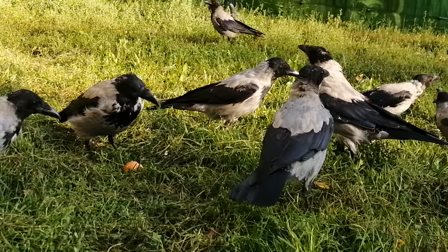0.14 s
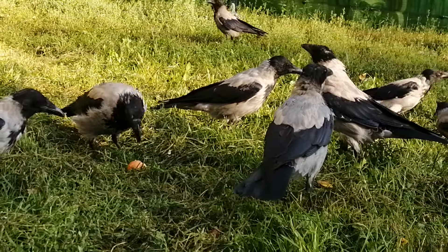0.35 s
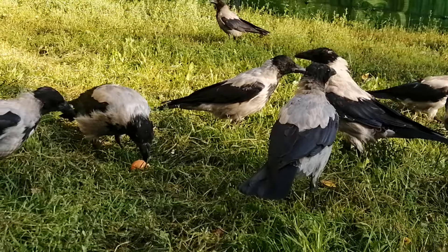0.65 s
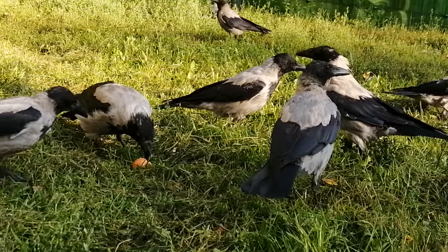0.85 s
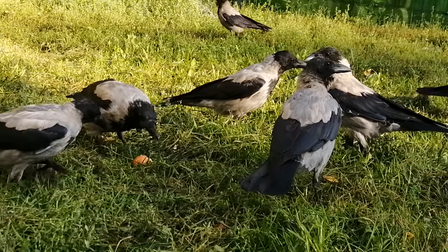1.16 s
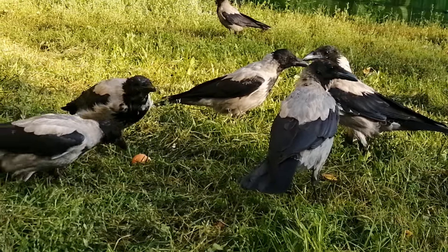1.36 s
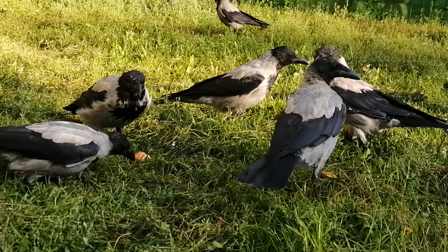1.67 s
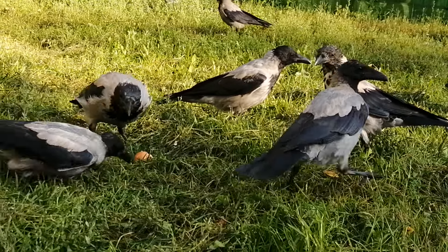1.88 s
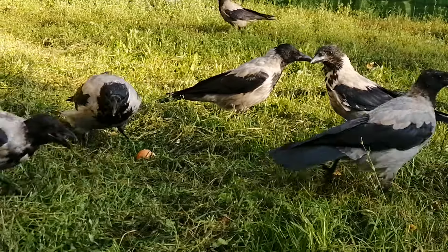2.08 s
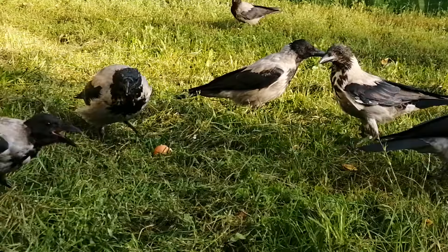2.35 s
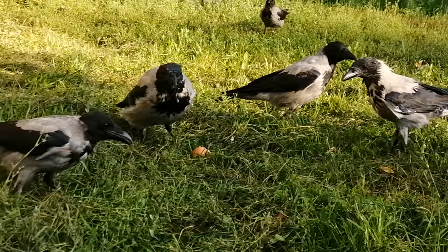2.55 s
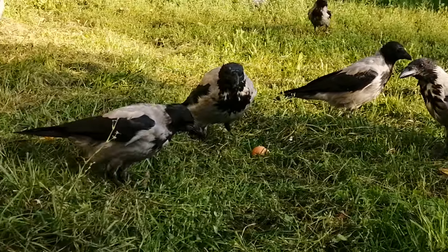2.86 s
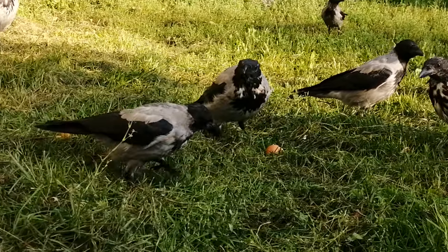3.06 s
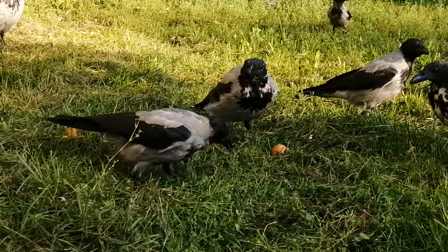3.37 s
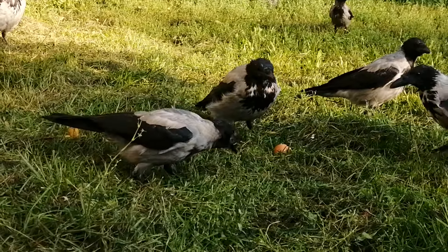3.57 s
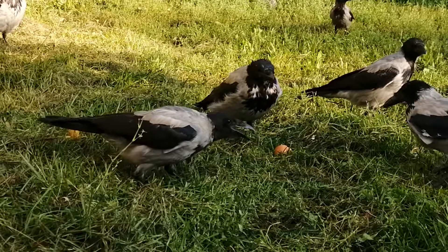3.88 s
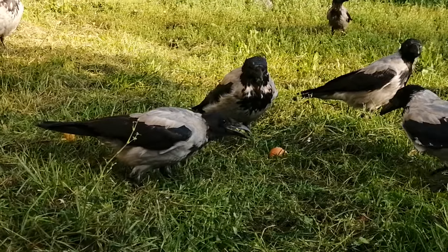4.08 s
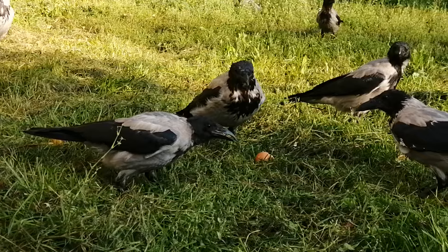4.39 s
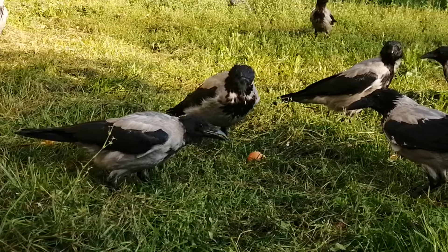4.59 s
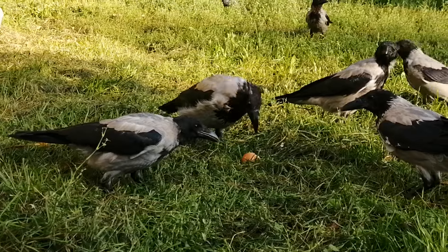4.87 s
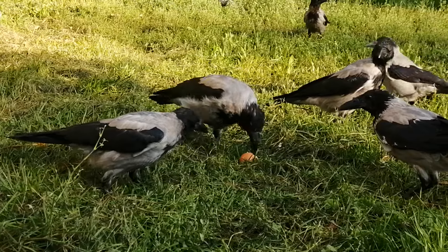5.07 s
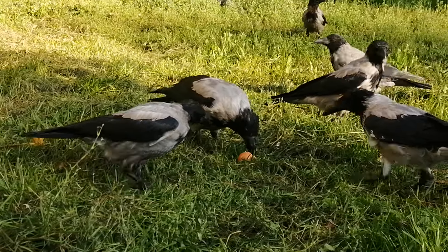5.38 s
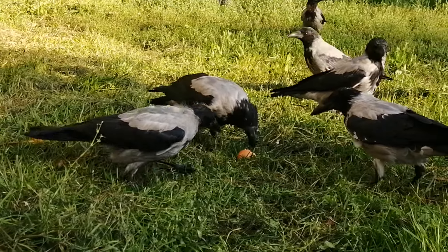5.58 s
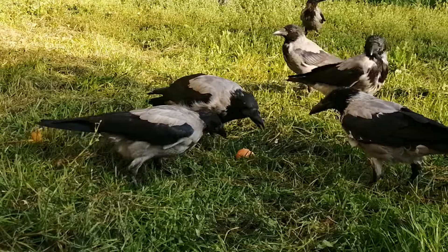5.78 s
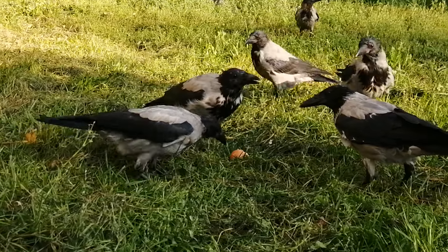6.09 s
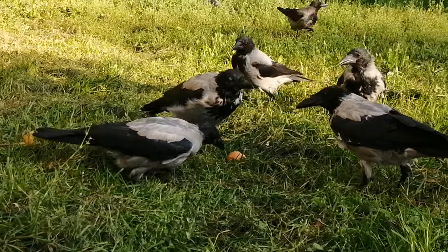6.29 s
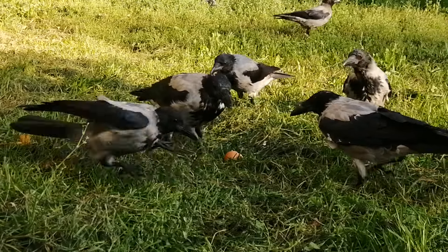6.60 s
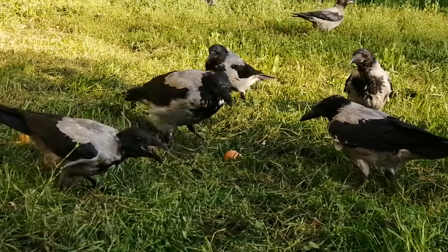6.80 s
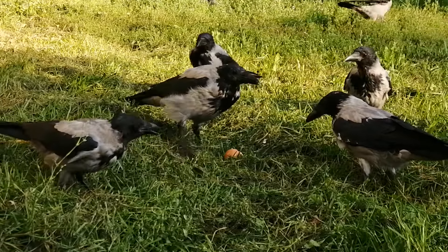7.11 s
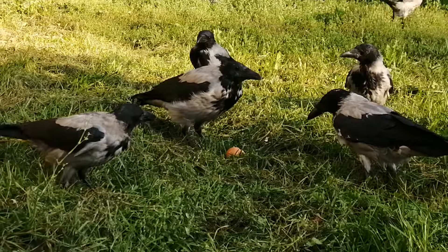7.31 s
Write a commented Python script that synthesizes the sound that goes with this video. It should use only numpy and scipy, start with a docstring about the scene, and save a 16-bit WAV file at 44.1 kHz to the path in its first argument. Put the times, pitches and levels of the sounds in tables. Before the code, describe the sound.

Crows forage near the microphone on an open lawn, over a soft, steady rumble of distant town traffic. A low, rough grunt opens the scene and fades within half a second. Light, dry ticks of beaks and claws follow, the sharpest near 1 second, with very faint crackling of grass underfoot. At 2 seconds a crow gives one harsh, rattling caw, under half a second long, dropping in pitch at its end. A peck lands at 3 seconds, and a second caw follows at 3.5. Then comes a lull with only a few small ticks, around 4.2, 5.1 and 6 seconds. A quiet growl begins at 6.4 seconds and runs into the third caw at 6.7. Several short, low, throaty growls answer from about 7.1 to 7.5 seconds. The caws are the loudest sounds, each leaving a faint, brief echo from the trees.

```python
"""Hooded crows squabbling on a lawn

Nearby crows give three harsh caws and a few low growls over a scrap. Both sides of the syrinx vibrate
at once, as coupled oscillators whose beat makes the rattle; windpipe, throat and beak filter the pulses.
Beaks and feet tick and crackle in the grass. A far fence and trees reflect a faint echo of the calls
and ticks, over the rumble of a town."""
import sys
import numpy as np
from scipy import signal
from scipy.fft import rfft, irfft
from scipy.io import wavfile
from scipy.ndimage import uniform_filter1d

SR = 44100
rng = np.random.default_rng(int(sys.argv[2]) if len(sys.argv) > 2 else 0)


def pcm_store(signal):
    """Save signal as 16-bit PCM."""
    levels = np.round(np.clip(np.atleast_2d(signal), -1, 1) * 32767)
    wavfile.write(sys.argv[1], SR, levels.astype(np.int16).T)


N = 328479

# Response of throat and beak as each bird faces the listener, one table for each kind of call:
# frequency_hz, gain_db, left_minus_right_db, left_lead_rad
FIRST_CAW_THROAT = [(183, -16.5, 4, 0.7), (327, -10, 4, 0.14), (875, -16.5, 4.5, 0.67),
                    (1056, -24.5, -8, 1.65), (1562, 6.5, -5, 2.29), (1933, 5.5, -1, 3.65),
                    (2400, -5, 3, 5.63), (2990, -12.5, -1.5, 5.1), (3540, -19, -10.5, 3.5),
                    (3890, -10, -9, 8), (4960, -9.5, 6.5, 8), (5920, -17, -9, 8.5),
                    (6650, -11.5, -3.5, 10.6), (8070, -24, -24, 10.3), (11000, -42.5, -8, 18.3),
                    (14500, -53.5, -20, 5)]
SECOND_CAW_THROAT = [(173, 0.5, 13, 0.5), (340, 8.5, 0.5, 0.14), (660, 6.5, 2.5, 0.23), (1250, 0, -0.5, 1),
                     (1394, -10.5, -9, -2.5), (1820, 1, 2, 4), (2450, -9, 1.5, 4.5), (2930, -8, 2.5, 4),
                     (3720, -6, -15, 7), (3700, 1, -0.5, 9), (4550, -3.5, -10.5, 4), (6240, -6.5, 1.5, 7.5),
                     (6930, -18.5, -5, 8), (8540, -29.5, -13, 3.5), (11000, -40.5, -11, 5),
                     (14500, -49, -24, -6)]
THIRD_CAW_THROAT = [(179, -18, 4, 1), (342, -13, 3.5, 0.16), (800, -18.5, 3.5, 0.44), (1194, -21.5, -5, 2),
                    (1520, 8.5, -8.5, 1.5), (2080, 9, 2.5, 4), (2290, 2, 1, 5), (2870, -6.5, 7, 8.5),
                    (3420, -13.5, -24, 6), (4250, -8.5, -2, 14.5), (5530, -10, 1, 12.5),
                    (6340, -17, -22, 18.5), (7150, -17, 0.5, 16.5), (8180, -27.5, -10, 13),
                    (10700, -45, -17, -8), (14500, -58, -18, 21)]
GRUNT_THROAT = [(200, -18, -9, 1), (390, 8, -4, -0.1), (845, -8, 5, 1.5), (1200, -10, -1, 0.4),
                (2040, -14.5, 25, -0.5), (2310, -5, 2, 5), (2950, -11.5, -5, 3.5), (3810, -2, -2, 4.6),
                (4200, -20, 6, 8), (5730, -9.5, -2, 7.5), (7650, -18, -10, 11.5), (8550, -45, -8, 6),
                (14000, -47, -2, 9)]
GROWL_THROAT = [(199, -16, -2, 1), (397, 7, 1, 0.27), (900, -2.5, 3.5, 0.61), (1530, -30, 3, 2.0),
                (2430, -18, 10, 6.1), (2920, -20, 2, 1.1), (3720, -8.5, -0.5, 7.4), (4670, -19, -11, 20),
                (5100, -16, 1, 6.9), (7600, -23, -16, 7.6), (8900, -33, -14.5, 15), (14100, -49, 4, 6)]
REPLY_THROAT = [(201, -3.5, -21, 0.5), (450, 18, -9, -1), (1150, -2.5, -6, -1.5), (1410, 9.5, 0, -2.5),
                (1970, -3, 10, -2), (2210, 8, 4, 1.4), (3350, -26, -4, 1), (4350, -13, 5, 4.5),
                (5100, -23, -6, -3.5), (5860, -21, -1, -1), (7600, -33, -17, -6), (9000, -56, -6, -3),
                (14000, -70, -6, -11)]
# Caws: start_s, length_s, attack_s, crest_s, top_pitch_hz, flat_start_share, second_pitch_ratio,
# second_join_s, second_gain, crest_roughness, low_db, throat_db, edge_db, fade_db_per_s, echo_send_db
CAW_CALLS = [(2.011, 0.377, 0.024, 0.25, 348.5, 0.325, 1.26, 0.115, 0.69, 0.25, -39.5, -26.5, -31.5, -18, -2),
             (3.49, 0.417, 0.048, 0.205, 328.2, 0.085, 1.32, -0.034, 0.41, 0.37, -40, -36.5, -37, -14.5, 2.5),
             (6.679, 0.354, 0.011, 0.19, 334.3, 0.22, 1.26, -0.01, 0.4, 0.33, -39, -29, -33, -14.5, -2)]
# Two windpipe resonances for each caw:
# slide_at_s, lower_from_hz, lower_to_hz, upper_from_hz, upper_to_hz, gain_before, gain_after, flare_db
WINDPIPE_RESONANCES = [(0.106, 2330, 2290, 5900, 4120, 1.0, 0.77, 3.5),
                       (0.092, 2500, 2310, 4760, 4040, 1, 1.05, 0.5),
                       (0.262, 2320, 2320, 5630, 4200, 1, 1.5, -0.3)]
# Growls, the last row being the onset of a further call just as the sound ends: start_s, length_s, pitch_hz,
# attack_s, low_db, throat_db, edge_db, fade_db_per_s, throat_name
GROWL_CALLS = [(0.016, 0.29, 196.7, 0.022, -47, -44.5, -50.5, -125, "grunt"),
               (0.322, 0.074, 186, 0.01, -61.5, -65.5, -89, -15, "grunt"),
               (6.421, 0.28, 212.7, 0.03, -53.5, -66, -66.5, 16, "growl"),
               (6.662, 0.05, 224.5, 0.0049, -46.5, -45.5, -47.5, -28, "reply"),
               (7.083, 0.19, 191, 0.017, -58.5, -67.5, -82, 41, "reply"),
               (7.193, 0.128, 201.6, 0.038, -44.5, -41.5, -50.5, -83, "reply"),
               (7.301, 0.15, 192.6, 0.015, -55.5, -52.5, -65, 18, "reply"),
               (7.434, 0.065, 185, 0.012, -69, -43.5, -42.5, -23, "reply")]
# Pecks and steps: start_s, level_db, t60_s, left_minus_right_db, tilt_db_per_octave
IMPACTS = [(0.3616, -62, 0.06, 2.5, 2), (0.8516, -52.5, 0.078, 10, -0.5), (0.9589, -42.5, 0.007, -11, 8),
           (1.3478, -60.5, 0.02, -3, 12), (1.5594, -62, 0.025, -8, 2), (2.4384, -61, 0.032, -16, 16),
           (2.5643, -55, 0.053, -6, 3), (3.0131, -45.5, 0.079, -3, -1.5), (4.2137, -51, 0.016, -8, 3),
           (5.0903, -52.5, 0.033, -4, 2.5), (5.9728, -55.5, 0.012, -4, 20.5), (6.382, -65, 0.012, -4, 19)]
# Spectrum of a beak or claw impact: frequency_hz, gain_db
IMPACT_SPECTRUM = [(530, 13), (900, -2), (1620, -19), (2010, 9.5), (2810, -12.5), (4050, -2), (5280, -9),
                   (5990, -14), (8350, -34.5), (9810, -52), (14000, -50)]
# Bouts of walking: middle_s, half_length_s, level_db
WALKING_BOUTS = [(1.35, 0.94, -81), (2.965, 0.26, -72), (5.15, 0.2, -78.5), (7.4, 0.85, -75)]
# Spectrum of crackling blades: frequency_hz, gain_db
GRASS_SPECTRUM = [(1500, -4), (3000, 0), (5500, 0.5), (7600, -1.5), (8800, -15.5), (14500, -20)]
# Spectrum returned by the trees: frequency_hz, gain_db
ECHO_SPECTRUM = [(200, 7), (600, 5.5), (1200, -2), (2000, 11), (2900, 1.5), (5000, 3), (12000, 10)]
# Spectrum of the town and the air: frequency_hz, relative_density_db
TOWN_SPECTRUM = [(12, -39), (20, -21.5), (59, -3), (76, -2.5), (189, -14.5), (211, -11), (270, -20),
                 (302, -18), (328, -20.5), (484, -27.5), (940, -29), (2220, -42), (5690, -52), (9630, -66),
                 (15000, -70)]
# Likeness of the town's sound at left and right: frequency_hz, correlation
TOWN_CORRELATION = [(60, 0.97), (130, 0.87), (290, 0.89), (640, 0.39), (1400, -0.4), (3090, 0.0039),
                    (6790, -0.089), (14900, -0.022)]
# Balance of the town's sound: frequency_hz, left_minus_right_db
TOWN_BALANCE = [(60, -1.0), (180, -1.5), (550, 0), (1640, -5.5), (4960, 0.5), (14900, -4)]

# The voice has three bands: low tones, throat, treble edge.
BAND_DB_PER_SAG = (-15, -28, -26.5)  # each weakens as the pitch sags below its crest
BAND_ATTACK_RATIOS = (0.57, 1.32, 1)  # the low tones speak first


def crows():
    """Direct and reflected paths: returns the calls heard nearby and those that carry to the trees."""
    near, far = np.zeros((2, 2, N))
    throats = (FIRST_CAW_THROAT, SECOND_CAW_THROAT, THIRD_CAW_THROAT)
    for (start_s, *call, echo_send_db), pipe, throat in zip(CAW_CALLS, WINDPIPE_RESONANCES, throats):
        sound = caw(call, pipe, throat)
        add(near, start_s, sound)
        add(far, start_s, sound * amp(echo_send_db))
    for start_s, *call in GROWL_CALLS:
        sound = growl(*call)
        add(near, start_s, sound)
        add(far, start_s, sound)
    return near, far


def caw(call, pipe, throat, fall_share=0.26, yelp_s=0.0282, yelp_hz=15.75, solo_grip=0.29):
    """Source and filter: one arch of effort sets the pitch, loudness and roughness of the syrinx."""
    (length_s, attack_s, crest_s, top_hz, flat_share, second_ratio, join_s, second_gain,
     crest_roughness, *bands_db, fade_db_per_s) = call
    t = np.arange(SR // 2) / SR
    # the pitch overshoots in a yelp, climbs to its crest, then drops ever faster
    yelp = 0.313 * np.exp(-t / yelp_s) * np.cos(2 * np.pi * yelp_hz * t)
    sag = flat_share * (np.clip(1 - t / crest_s, 0, 1) ** 1.35 + yelp)
    sag += fall_share * np.clip((t - crest_s) / (length_s - crest_s), 0, 1) ** 2.3
    pitch_hz = top_hz * (1 - sag)
    # the coupling tightens as the second side joins and pulls away to its own pitch
    grip = solo_grip + (1 - solo_grip) * step(t, join_s, width_s=0.0058)
    detuning = (second_ratio - 1) * (1 + step(t, join_s, width_s=0.0194)) / 2
    wander = np.exp(0.312 * drift(len(t), 17.8))
    roughness = np.minimum(grip * (crest_roughness + 1.46 * sag) * wander, 1)
    voice = syrinx(pitch_hz, pitch_hz * (1 + detuning), 0.61 * grip, roughness, second_gain,
                   jitter_s=0.0001, hiss=0.78)
    voice, flare_db = windpipe(voice, t, pipe)
    low_db, throat_db, edge_db = (
        db + db_per_sag * sag + fade_db_per_s * (t - crest_s) + envelope_db(t, ratio * attack_s, length_s)
        for db, db_per_sag, ratio in zip(bands_db, BAND_DB_PER_SAG, BAND_ATTACK_RATIOS))
    return radiate(voice, throat, (low_db, throat_db + flare_db, edge_db), smear_ms=1.137)


def growl(length_s, pitch_hz, attack_s, low_db, throat_db, edge_db, fade_db_per_s, throat_name,
          beat_hz=80.8, sink_hz_per_s=95):
    """Low tension: the slack membranes of the syrinx vibrate slowly and unevenly, sinking in pitch."""
    t = np.arange(SR // 2) / SR
    main_hz = pitch_hz - sink_hz_per_s * t
    voice = syrinx(main_hz, main_hz + beat_hz, coupling=0.34, roughness=np.full(len(t), 0.88),
                   second_gain=0.9, jitter_s=0.000477, hiss=0.75)
    throat = {"grunt": GRUNT_THROAT, "growl": GROWL_THROAT, "reply": REPLY_THROAT}[throat_name]
    contour_db = fade_db_per_s * t + envelope_db(t, attack_s, length_s)
    return radiate(voice, throat, [db + contour_db for db in (low_db, throat_db, edge_db)], smear_ms=0.836)


def syrinx(main_hz, second_hz, coupling, roughness, second_gain, jitter_s, hiss, rattle_depth=0.5):
    """Coupled oscillators: two membranes squeeze each other and rattle at their difference frequency."""
    n = len(main_hz)
    main_cycles, second_cycles = (np.cumsum(hz * (1 + 0.02397 * roughness * drift(n, 71.8))) / SR
                                  for hz in (main_hz, second_hz))
    rattle = np.exp(rattle_depth * coupling * np.cos(2 * np.pi * (second_cycles - main_cycles)))
    pull_cycles = 0.12 * second_gain * coupling * np.sin(2 * np.pi * second_cycles)
    main = claps(main_cycles + pull_cycles, rattle, jitter_s * roughness, 0.26 * roughness)
    second = claps(second_cycles, second_gain * coupling * rattle, jitter_s * roughness, 0.67 * roughness)
    # air escapes in a puff after each clap
    puffs = np.exp(-(main_cycles % 1) / 0.33) * rattle * rng.standard_normal(n)
    # the second membrane also swings smoothly, which gives a clean low tone
    low_tone = 0.077 * coupling * np.cos(2 * np.pi * second_cycles)
    voice = unit(main + second) + hiss * roughness * unit(puffs) + low_tone
    # one side alone sounds pinched, with a weak fundamental
    return voice - 0.8 * (1 - coupling) * resonate(voice, main_hz, width_hz=120)


def claps(cycles, height, jitter_s, shimmer):
    """Pulse train: a membrane claps once a cycle, with jitter in timing and shimmer in size."""
    at = np.flatnonzero(np.diff(np.floor(cycles)) > 0)
    timing_error, size_error = rng.standard_normal((400, 2))[:len(at)].T
    crossing = at + (np.ceil(cycles[at]) - cycles[at]) / (cycles[at + 1] - cycles[at])
    centre = crossing + SR * jitter_s[at] * timing_error
    size = height[at] * np.exp(shimmer[at] * size_error)
    # a windowed sinc places each pulse between samples
    samples = np.floor(centre)[:, None].astype(int) + np.arange(-7, 9)
    offset = samples - centre[:, None]
    pulses = size[:, None] * np.sinc(offset) * np.cos(np.pi * offset / 16) ** 2
    return np.bincount(np.clip(samples, 0, len(cycles) - 1).ravel(), pulses.ravel(), len(cycles))


def windpipe(voice, t, pipe, slide_s=0.011, flare_s=0.035):
    """Air-column resonance: two trembling modes slide as the beak shifts. Returns sound and flare."""
    slide_at_s, *endpoints, peak_flare_db = pipe
    slide = step(t, slide_at_s, slide_s)
    lower_hz, upper_hz, gain = (a + (b - a) * slide for a, b in zip(endpoints[::2], endpoints[1::2]))
    flare_db = peak_flare_db * np.exp(-((t - slide_at_s) / flare_s) ** 2)
    tremble = 1 + 0.01 * drift(len(t), 70)
    lower = amp(flare_db) * resonate(voice, lower_hz * tremble, width_hz=230)
    upper = 1.27 * resonate(voice, upper_hz * tremble, width_hz=290)
    return voice + gain * (lower + upper), flare_db


def radiate(voice, throat, levels_db, smear_ms):
    """Radiation from throat and beak: low tones, throat band and treble edge each follow their level."""
    hz = np.fft.rfftfreq(len(voice), 1 / SR)
    filtered = colour(voice, lambda f: curve(throat, f))
    spectra = stereo_spectra(scatter(filtered, smear_ms), throat)
    spectra *= 1 - 1 / (1 + (hz / 200) ** 8)  # so small a body radiates no bass
    low, below_edge = (1 / (1 + (hz / corner_hz) ** 12) for corner_hz in (1150, 3300))
    sound = 0
    for share, level_db in zip((low, below_edge - low, 1 - below_edge), levels_db):
        band = irfft(spectra * share, len(voice))
        running_rms = np.sqrt(uniform_filter1d((band ** 2).mean(0), size=3000) + 1e-20)
        sound = sound + band / running_rms * amp(level_db)
    return sound


def stereo_spectra(x, throat, stray_hz=8500):
    """Direction cues: left and right differ in gain and phase, and stray apart in the top treble."""
    hz = np.fft.rfftfreq(len(x), 1 / SR)
    balance = amp(curve(throat, hz, column=2))
    stray = np.minimum((hz / stray_hz) ** 4, 2) * drift(len(x), 1400)[:len(hz)]
    lead_rad = curve(throat, hz, column=3) + stray
    return rfft(x) * np.array([balance * np.exp(1j * lead_rad), np.ones(len(hz))]) / np.hypot(balance, 1)


def scatter(x, smear_ms):
    """Scattering near the ground: each frequency has its own delay and gain, so pulses are smeared."""
    hz = np.fft.rfftfreq(len(x), 1 / SR)
    delay_s = smear_ms / 1000 * drift(len(x), 180)[:len(hz)] ** 2
    # echoes a few milliseconds late cut a fine comb into the treble
    comb = drift(len(x), 480)[:len(hz)]
    comb = unit(comb - uniform_filter1d(comb, size=220))
    ripple = amp(3 * comb * np.minimum(hz / 3500, 1))
    lag_rad = 2 * np.pi * np.cumsum(delay_s) * SR / len(x)
    return irfft(rfft(x) * ripple * np.exp(-1j * lag_rad), len(x))


def pecks(gain_db=-1, ring_hz=3950, ring_t60_s=0.14, settle_db=-20, settle_t60_s=0.3):
    """Impact and damped vibration: beak or claw ticks and rings briefly, then the grass settles."""
    mix, t = np.zeros((2, N)), np.arange(SR // 4) / SR
    settling = amp(settle_db - 60 * t / settle_t60_s)
    hardest_db = max(row[1] for row in IMPACTS)
    for start_s, level_db, t60_s, pan_db, tilt_db in IMPACTS:
        def spectrum_db(hz):
            return curve(IMPACT_SPECTRUM, hz) + tilt_db * np.log2((hz + 200) / 4000)
        noise = np.array([unit(colour(rng.standard_normal(len(t)), spectrum_db)) for _ in range(2)])
        tick = noise * (amp(-60 * t / t60_s) + settling)
        ring_db = -10.5 + 4.9 * (level_db - hardest_db)  # softer ticks ring far less
        ring = unit(resonate(noise[0], np.full(len(t), ring_hz), width_hz=450))
        ring *= amp(ring_db - 60 * t / ring_t60_s)
        add(mix, start_s, (tick + ring) * amp(level_db + gain_db + np.array([[0.5], [-0.5]]) * pan_db))
    return mix


def grass(clicks_per_s=450, shuffle_db=-81, left_db=-3):
    """Shot noise: blades crackle underfoot, swelling with each walk above the flock's steady shuffle."""
    size = amp(3 * np.minimum(rng.exponential(1, (2, N)), 4))
    clicks = (rng.random((2, N)) < clicks_per_s / SR) * rng.standard_normal((2, N)) * size
    blades = [colour(side, lambda hz: curve(GRASS_SPECTRUM, hz)) for side in clicks]
    crackle = np.array([unit(scatter(side, smear_ms=5.4)) for side in blades])
    t = np.arange(N) / SR
    walking_power = sum(amp(level_db) ** 2 * np.exp(-((t - middle_s) / half_s) ** 2)
                        for middle_s, half_s, level_db in WALKING_BOUTS)
    return crackle * np.sqrt(amp(shuffle_db) ** 2 + walking_power) * amp([[left_db], [0]])


def trees(sound, gain_db=-28, t60_s=0.62, fence_db=-21, fence_s=0.23, fence_hz=2100):
    """Diffuse reflection: trees return a thin tail, the far fence one soft, nasal cluster of echoes."""
    t = np.arange(SR) / SR
    leaves = rng.standard_normal((2, SR)) * amp(-60 * t / t60_s) * (t > 0.015)
    fence = np.array([unit(resonate(noise, np.full(SR, fence_hz), width_hz=1000))
                      for noise in rng.standard_normal((2, SR))])
    tails = leaves + amp(fence_db) * fence * np.exp(-((t - fence_s) / 0.022) ** 2)
    tails /= np.linalg.norm(tails[0])
    echoes = [signal.fftconvolve(side, tail)[:N] for side, tail in zip(sound, tails)]
    return amp(gain_db) * np.array([colour(echo, lambda hz: curve(ECHO_SPECTRUM, hz)) for echo in echoes])


def town(level_db=-51.5, patch_db=2.0):
    """Partly coherent noise: distant traffic gives a rumble common to both sides, with hiss above it."""
    frames, hz = N // 512 + 6, np.fft.rfftfreq(2048, 1 / SR)
    left_re, left_im, other_re, other_im, patches = rng.standard_normal((5, frames, len(hz)))
    # the level wavers in small patches of time and frequency
    patches = unit(uniform_filter1d(uniform_filter1d(patches, size=12, axis=0), size=10, axis=1))
    correlation, balance = curve(TOWN_CORRELATION, hz), amp(curve(TOWN_BALANCE, hz) / 2)
    left = left_re + 1j * left_im
    right = correlation * left + np.sqrt(1 - correlation ** 2) * (other_re + 1j * other_im)
    spectra = np.array([left * balance, right / balance])
    spectra *= amp(curve(TOWN_SPECTRUM, hz) + patch_db * patches) / np.sqrt(1 + correlation)
    rumble = signal.istft(spectra.swapaxes(1, 2), nperseg=2048, noverlap=1536)[1][:, :N]
    return amp(level_db) * rumble / np.std(rumble.mean(0))


def resonate(x, hz, width_hz):
    """Driven resonance: a damped mode of gain 1 follows the curve hz."""
    rotation, pole = np.exp(2j * np.pi * np.cumsum(hz) / SR), np.exp(-np.pi * width_hz / SR)
    return 2 * (rotation * signal.lfilter([1 - pole], [1, -pole], x / rotation)).real


def colour(x, db_at, size=4096):
    """Minimum-phase filtering: a causal response with the gain db_at(hz)."""
    hz = abs(np.fft.fftfreq(size, 1 / SR))
    log_gain = np.log(amp(np.maximum(db_at(hz), -100)))
    taps = np.fft.ifft(np.exp(np.conj(signal.hilbert(log_gain)))).real[:size // 2]
    return signal.oaconvolve(x, taps)[:len(x)]


def drift(length, corner_hz):
    """Random fluctuation: low-passed noise of rms 1."""
    hz = np.fft.rfftfreq(length, 1 / SR)
    return unit(irfft(rfft(rng.standard_normal(length)) / (1 + (hz / corner_hz) ** 4), length))


def envelope_db(t, attack_s, length_s, release_s=0.03):
    """Amplitude envelope: attack, hold and release."""
    attack, release = np.clip(t / attack_s, 0, 1) ** 1.56, np.clip((length_s - t) / release_s, 0, 1)
    return 20 * np.log10(attack * release + 1e-9)


def step(t, at_s, width_s):
    """Smooth transition from 0 to 1."""
    return 0.5 + 0.5 * np.tanh((t - at_s) / (2 * width_s))


def curve(table, hz, column=1):
    """Interpolation of one column on a log-frequency axis."""
    columns = np.transpose(table)
    return np.interp(np.log(hz + 1), np.log(columns[0] + 1), columns[column])


def amp(db):
    """Decibels to amplitude ratio."""
    return 10 ** (np.asarray(db) / 20)


def unit(x):
    """Normalisation to rms 1."""
    return x / np.sqrt(np.mean(x ** 2) + 1e-20)


def add(mix, start_s, sound):
    """Superposition: a stereo sound joins the mix at start_s."""
    part = mix[:, round(start_s * SR):][:, :sound.shape[1]]
    part += sound[:, :part.shape[1]]


def scene():
    """Superposition of the birds, their echo, the grass and the town."""
    near, far = crows()
    ticks = pecks()
    return near + ticks + trees(far + ticks) + grass() + town()


def record(dry, cutoff_hz=15200):
    """Band limiting: a linear-phase low-pass removes the highest treble."""
    taps = signal.firwin(511, cutoff_hz, window=("kaiser", 9), fs=SR)
    return signal.oaconvolve(dry, taps[None], "same")


dry = scene()
out = record(dry)
pcm_store(out)
```